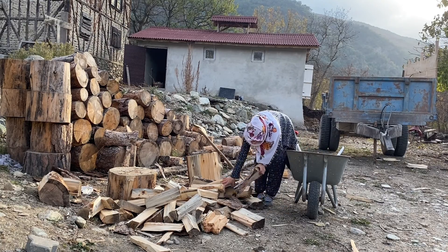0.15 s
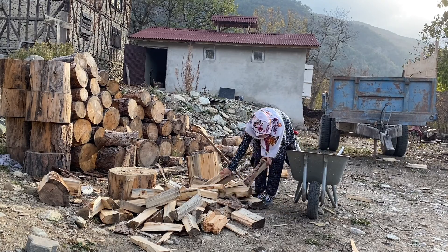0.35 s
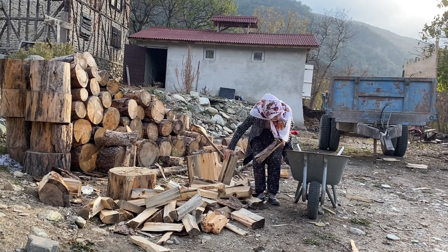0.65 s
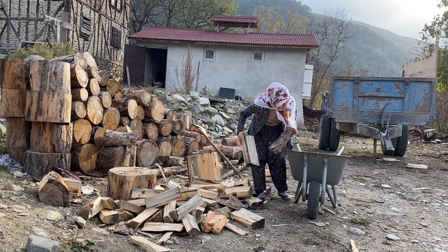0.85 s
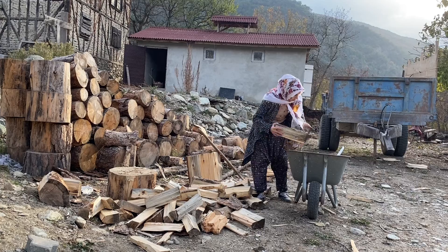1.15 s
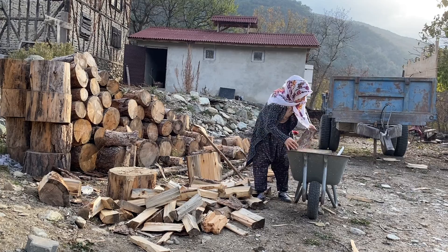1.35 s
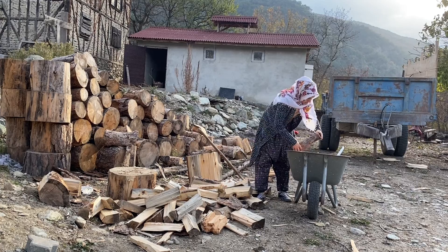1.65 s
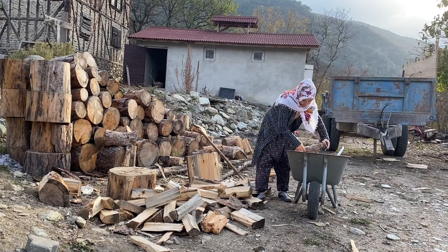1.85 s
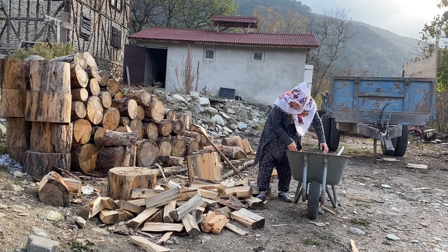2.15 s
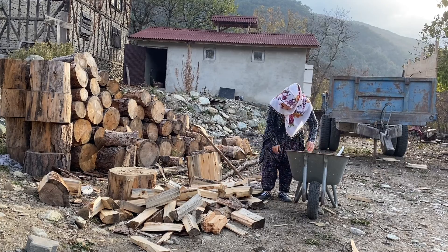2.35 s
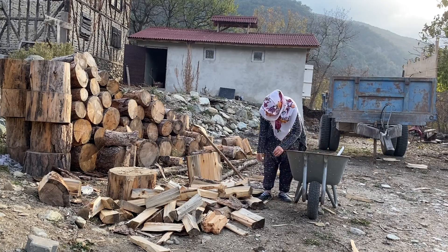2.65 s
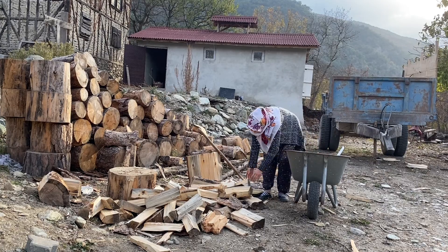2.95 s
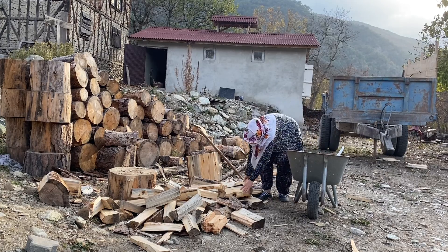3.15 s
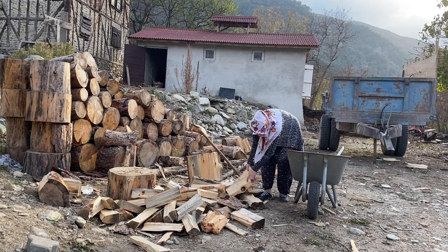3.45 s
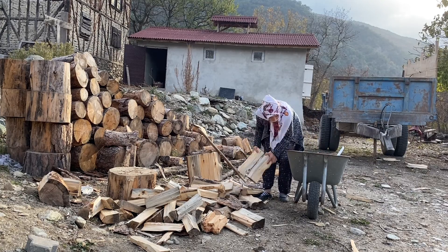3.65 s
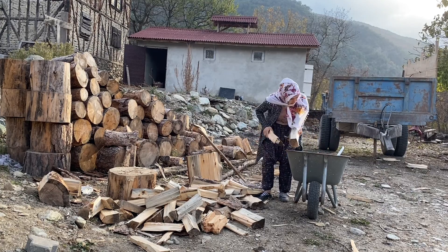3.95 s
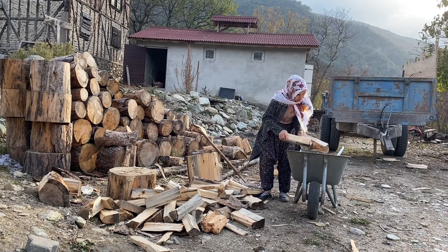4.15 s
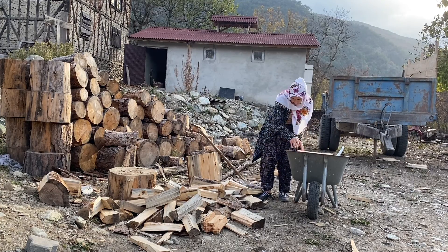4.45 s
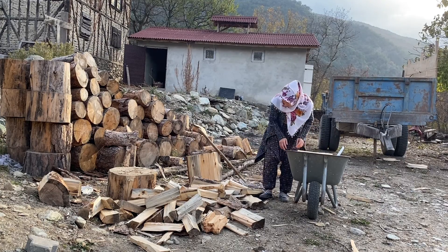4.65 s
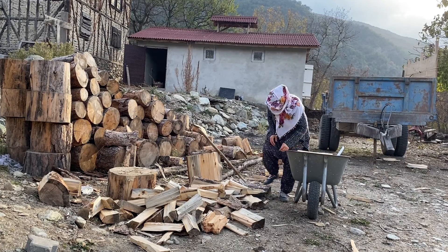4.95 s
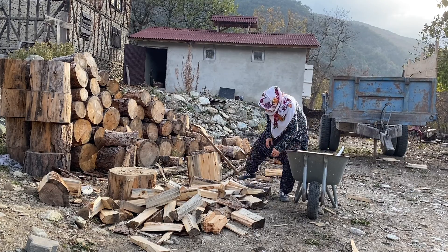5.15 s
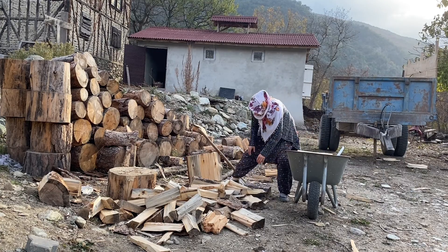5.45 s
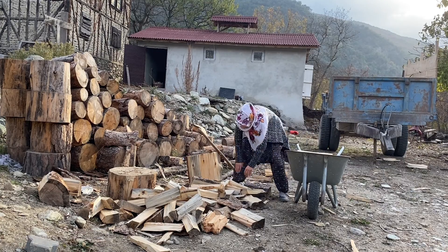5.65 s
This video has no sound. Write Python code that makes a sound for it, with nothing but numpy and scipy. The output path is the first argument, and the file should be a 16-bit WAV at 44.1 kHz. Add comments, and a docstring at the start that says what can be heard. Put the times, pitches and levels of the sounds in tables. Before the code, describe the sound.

Dry logs knock and rustle off a pile and twice tumble into a metal wheelbarrow with a hollow clang, in a quiet yard.

```python
"""Bark scrapes and logs clack over light wind: split firewood is pulled from a heap, a few metres away.
Rough wood slides in tiny slips, splinters snap, knocked logs ring at their bending modes, sleeves brush by.
Logs drop into a steel wheelbarrow and tumble; the tray booms, clangs and rings on.
Wind rumbles at the microphone, a faint hum comes and goes, and the yard walls answer faintly."""
import sys
import numpy as np
from scipy import signal
from scipy.fft import rfft, irfft, next_fast_len
from scipy.io import wavfile
from scipy.ndimage import map_coordinates

SR = 44100
rng = np.random.default_rng(int(sys.argv[2]) if len(sys.argv) > 2 else 0)


def file_out(sig):
    """Save sig as 16-bit WAV at sys.argv[1]."""
    # one column per channel
    cols = np.atleast_2d(sig).T
    # limit, then scale
    lim = np.clip(cols, -1, 1)
    pcm = np.round(lim * 32767).astype(np.int16)
    wavfile.write(sys.argv[1], SR, pcm)


N = 255339
TIME_S = np.arange(N) / SR
AGE_S = np.arange(SR) / SR  # time since a blow

# Events; levels are relative, each layer adds its own gain.
WIND_GUSTS = [(0.0, 0.3, -62), (2.33, 0.11, -53), (2.7, 0.5, -65.5)]  # start_s, length_s, level_db
WOOD_SCRAPES = [(0.0, 0.36, -66, -75.5), (0.38, 0.38, -61, -64.5), (0.61, 0.04, -46, -64),
                (1.43, 0.2, -58, -71.5), (1.98, 0.14, -62, -68.5), (2.22, 0.12, -57.5, -66.5),
                (2.64, 0.25, -63, -83.5), (3.33, 0.33, -55.5, -62), (3.72, 0.3, -63, -79.5),
                (4.35, 0.15, -56, -66.5), (4.55, 0.8, -71, -81.5)]  # start_s, length_s, rub_db, rustle_db
LOG_KNOCKS = [(0.026, -52, -45.5, 455, -65), (0.162, -63, -42.5, 582, -81), (0.531, -31.5, -39, 456, -45),
              (0.608, -23, -33, 1000, -49), (0.617, -10.5, -35, 1110, -42), (0.631, -22, -26, 458, -37),
              (0.65, -22, -24, 1109, -48), (0.744, -41, -46, 564, -60), (0.867, -56, -45.5, 580, -67),
              (1.974, -24, -34, 679, -42), (2.01, -20, -19, 1080, -42), (2.637, -37, -36.5, 794, -74),
              (2.701, -45, -50, 800, -72), (3.406, -35, -43, 1110, -36.5), (3.549, -50, -47, 466, -56),
              (3.75, -39, -35, 455, -37), (3.758, -23.5, -29.5, 450, -37), (3.774, -21, -20.5, 630, -38.5)]  # start_s, clack_db, ring_db, favoured_hz, crack_db
SPLINTER_SNAPS = [(0.0972, -55, -58.5), (0.2775, -44.5, -65.5), (0.4415, -42, -46), (0.4993, -40, -59),
                  (0.5448, -29, -44.5), (0.7317, -44.5, -53), (1.4151, -21.5, -37), (1.4472, -28, -34),
                  (1.8767, -36.5, -43), (2.2355, -41, -57.5), (2.26, -44, -61), (2.302, -46.5, -67),
                  (3.3003, -48.5, -55), (3.324, -46, -53), (3.3421, -39.5, -50), (3.442, -39.5, -46.5),
                  (3.6069, -39, -41), (3.7403, -33.5, -43), (4.0463, -53.5, -61), (4.336, -25, -59),
                  (4.4088, -23.5, -38.5), (5.0923, -64, -65), (5.618, -47, -76)]  # start_s, snap_db, edge_db
SOFT_THUMPS = [(0.26, -40), (0.369, -31.5), (0.533, -37), (2.258, -36), (2.339, -33), (2.666, -38.5)]  # start_s, level_db
SLEEVE_SWISHES = [(0.962, -69, 0.018), (1.185, -74.5, 0.018), (1.312, -63, 0.019), (4.679, -75, 0.074),
                  (4.755, -76, 0.085)]  # centre_s, level_db, half_width_s
TRAY_LANDINGS = [(1.4175, -10, -14.5, -25), (1.4314, -10.5, -14, -25), (1.4569, -9, -21.5, -26.5),
                 (1.4869, -27, -20.5, -38.5), (1.626, -21, -31, -49), (1.6391, -13, -42.5, -59),
                 (1.671, -24.5, -38.5, -57), (1.986, -26, -45, -47.5), (2.0111, -47, -23, -26),
                 (2.037, -24, -28, -34), (2.0732, -19.5, -37, -41), (4.3473, -15.5, -35.5, -39),
                 (4.3586, -19, -29, -38), (4.3866, -11.5, -31.5, -44.5), (4.4287, -17.5, -23.5, -37),
                 (4.4459, -11, -29.5, -46), (4.4743, -22, -31, -54)]  # start_s, boom_db, clang_db, rattle_db
HUM_SWELLS = [(3.68, 0.54, -60)]  # start_s, length_s, level_db

# Modes: pitch_hz, level_db, t60_s
STICK_MODES = [(560, -0.5, .05), (969, 2.5, 0.041), (1790, -4, 0.079), (2490, -4, 0.074),
               (3920, -22, 0.016)]  # thin split piece
LOG_BENDING_MODES = [(459, 6, 0.034), (581, 0.5, 0.085), (807, 13.5, 0.0092), (1098, -1, 0.034)]
LOG_HIGH_MODES = [(290, -21, 0.087), (1177, -17.5, 0.2), (1698, -7.5, 0.08), (2254, -4.5, 0.064),
                  (2370, -5, .05)]  # brought out by hard contact
THUMP_MODES = [(56.6, 3.5, 0.1), (93, -9, 0.075)]
TRAY_PANEL_MODES = [(74.6, -14, 0.038), (107.7, -10.5, 0.55), (135, -8, 0.096), (158, -5, 0.14),
                    (193.7, -1.5, 0.25), (205, 8.5, 0.05), (225.9, -1.5, 0.23), (239, -7, 0.17),
                    (251, -28, 0.37), (293.8, -11, 0.49), (378, -14.5, 0.18), (392.4, -23, 1.25),
                    (443, -32, 0.94)]
TRAY_CLANG_MODES = [(400.5, -0.5, 0.5), (539, -10, 0.64), (590, -14.5, 0.66), (646.6, 9, 0.11),
                    (685, -11.5, 0.99), (710.5, -3, 0.22), (780, -3, 0.37), (861, -3.5, 0.31),
                    (1000, -3.5, 0.31), (1065, -18.5, 0.43), (1440, -14, 0.37), (1843, -11.5, 0.22),
                    (2010, -18, 0.34)]

# Noise spectra: frequency_hz, density_db
HUSH_SPECTRUM = [(76, -19), (130, -6), (230, -10), (400, -11.5), (750, -12.5), (1500, -24), (2600, -27),
                 (3400, -36), (6500, -40), (9000, -52), (16000, -50)]
WIND_SPECTRUM = [(12, -31), (20, -14.5), (47, -1.5), (65, 3.5), (82, -2), (140, -16.5), (161, -23),
                 (220, -25), (290, -50), (480, -120)]
RUB_SPECTRUM = [(200, -1.5), (480, 7), (900, -3.5), (1300, -3.5), (2300, 0), (3200, -11), (5000, -13),
                (9000, -44)]  # wood over wood
CRACK_SPECTRUM = [(1500, -9.5), (3500, 1), (5000, 1), (7200, 2.5), (10000, -8), (13000, -5), (16000, -19.5)]  # treble of wood, bark and cloth
CLACK_SPECTRUM = [(120, -17.5), (330, 6), (700, -3.5), (1100, -6), (1500, -2.5), (2300, -3.5), (3200, -16),
                  (6000, -31.5), (15000, -64.5)]  # wood on wood
SNAP_SPECTRUM = [(250, 12.5), (900, -12), (1700, 2.5), (2400, 6), (3300, -9.5), (5000, -17.5),
                 (9000, -26.5)]  # splinters
BOOM_SPECTRUM = [(25, -57), (45, -20), (70, -5), (130, 14), (220, 9), (330, -8), (500, -20), (1200, -48.5)]  # tray, bass
CLANG_SPECTRUM = [(150, 0.5), (380, 5), (520, -1.5), (690, 1), (1000, 0), (1300, -17.5), (2000, -20.5),
                  (4000, -76)]  # tray, midrange
RATTLE_SPECTRUM = [(600, -21.5), (1400, 4), (2300, 3), (3200, -8), (5000, -19), (7500, -15), (11000, -31),
                   (16000, -29)]  # load in the tray

YARD_DECAY = [(100, 0.3), (600, 0.78), (2500, 0.24), (7000, 0.26), (15000, 0.22)]  # reverberation: frequency_hz, t60_s
MIC_PORTS = [(60, 0, 1.5), (500, 0, 0), (2200, -.1, 0), (3500, -.3, 4), (4500, -.5, 1), (7300, 0, 1),
             (8200, -1.4, 1), (9000, -3.1, .5), (10600, -6.1, 0), (11900, -6.8, 0), (13200, -9.4, 0),
             (14800, -12.4, .5)]  # frequency_hz, left_lead_rad, left_minus_right_db

SCRAPE_ATTACK_S, SCRAPE_RELEASE_S = 0.025, 0.05


def amp(db):
    """Decibels to gain."""
    return np.exp(np.asarray(db) * (np.log(10) / 20))


def unit(x):
    """Scale to rms 1."""
    return x / np.sqrt(np.mean(x ** 2) + 1e-20)


def along(points, hz):
    """Interpolate (frequency_hz, value) points on a log axis."""
    point_hz, values = np.transpose(points)
    return np.interp(np.log(hz + 1), np.log(point_hz + 1), values)


def wobble(rate_hz):
    """Smooth random curve through rate_hz knots a second."""
    grid = np.arange(0, N / SR * rate_hz + 1, 1 / 8)
    knots = rng.standard_normal(int(grid[-1]) + 3)
    return np.interp(TIME_S * rate_hz, grid, map_coordinates(knots, [grid]))


def noise(spectrum, width, size=N):
    """Coloured stereo noise, rms 1; width is side over mid."""
    n_fft = next_fast_len(size)
    colour = amp(along(spectrum, np.fft.rfftfreq(n_fft, 1 / SR)))
    mid, side = irfft(rfft(rng.standard_normal((2, n_fft))) * colour, n_fft)[:, :size]
    return unit(np.array([mid + width * side, mid - width * side]))


def strokes(rows, attack_s, release_s):
    """Attack, hold, release for (start_s, length_s, level_db, ..) rows; one curve per level column."""
    start_s, length_s, *levels_db = np.transpose(rows)
    age_s = TIME_S - start_s[:, None]
    rise = np.clip(age_s / attack_s, 0, 1)
    fall = np.exp(-np.maximum(age_s - length_s[:, None], 0) / release_s)
    return amp(levels_db) @ (rise * fall)


def burst(spectrum, t60_s, attack_s, width):
    """Decaying noise: many close modes struck together."""
    t = AGE_S[:int(1.5 * t60_s * SR)]
    return noise(spectrum, width, size=len(t)) * amp(-60 * t / t60_s) * (1 - np.exp(-t / attack_s))


def mode_waves(modes, attack_s, pitch_ratio=1):
    """One decaying sine per mode."""
    hz, db, t60_s = np.transpose(modes)[:, :, None]
    t = AGE_S[:int(t60_s.max() * SR)]
    envelope = amp(db - 60 * t / t60_s) * (1 - np.exp(-t / attack_s))
    return envelope * np.sin(2 * np.pi * hz * pitch_ratio * t)


def strike(waves, scatter_db):
    """Random mix of modes: each contact point favours different ones."""
    return amp(scatter_db * rng.standard_normal(len(waves))) @ waves


def ring(modes, attack_s, scatter_db, detune):
    """One blow on a piece of slightly random size."""
    pitch_ratio = np.exp(detune * rng.standard_normal())
    return strike(mode_waves(modes, attack_s, pitch_ratio), scatter_db)


def add(track, start_s, sound):
    """Mix a sound in at start_s."""
    start = max(round(start_s * SR), 0)
    part = sound[..., :N - start]
    track[:, start:start + part.shape[-1]] += part


def air():
    """Steady outdoor hush; breeze and gusts rumble at the microphone."""
    hush = amp(-61) * noise(HUSH_SPECTRUM, width=0.93)
    breeze = amp(-58)
    gusts, = strokes(WIND_GUSTS, attack_s=0.036, release_s=0.1)
    buffeting = amp(4.5 + 2.3 * wobble(11))
    return hush + (breeze + gusts) * buffeting * noise(WIND_SPECTRUM, width=0.32)


def scraping(jostles=110):
    """Rough wood slides in tiny uneven slips; harder rubbing jostles nearby pieces more often."""
    pressure, bark = strokes(WOOD_SCRAPES, SCRAPE_ATTACK_S, SCRAPE_RELEASE_S)
    slips = unit(amp(3.3 * wobble(260) + 1.9 * wobble(34)))
    rub = amp(-2.5) * pressure * noise(RUB_SPECTRUM, width=0.47)
    rustle = amp(-3.5) * bark * noise(CRACK_SPECTRUM, width=0.23)
    out = slips * (rub + rustle)
    for at in np.searchsorted(np.cumsum(pressure), rng.random(jostles) * pressure.sum()):
        stick = ring(STICK_MODES, attack_s=0.0006, scatter_db=2.5, detune=0.13)
        add(out, at / SR, amp(-0.5) * pressure[at] * stick)
    return out


def crumbling(snaps=34):
    """Dragged bark sheds small snaps, more and louder where it rustles most."""
    _, bark = strokes(WOOD_SCRAPES, SCRAPE_ATTACK_S, SCRAPE_RELEASE_S)
    out = np.zeros((2, N))
    quantiles = (np.arange(snaps) + rng.random(snaps)) / snaps
    for at in np.searchsorted(np.cumsum(bark), quantiles * bark.sum()):
        clack = burst(CLACK_SPECTRUM, t60_s=0.022, attack_s=0.0007, width=0.3)
        crack = burst(CRACK_SPECTRUM, t60_s=0.014, attack_s=0.00072, width=0.43)
        add(out, at / SR, amp(14) * bark[at] * clack)
        add(out, at / SR, amp(11) * bark[at] * crack)
    return out


def logs(focus_db_per_octave=32):
    """Two logs meet with a crack and a dry clack; bending modes near the favoured pitch ring most."""
    out = np.zeros((2, N))
    bending = mode_waves(LOG_BENDING_MODES, attack_s=0.00073)
    mode_hz = np.transpose(LOG_BENDING_MODES)[0]
    for start_s, clack_db, ring_db, favoured_hz, crack_db in LOG_KNOCKS:
        mode_db = ring_db - focus_db_per_octave * np.abs(np.log2(mode_hz / favoured_hz))
        mode_db[-1] = max(mode_db[-1], min(clack_db - 3, ring_db))  # a hard clack excites the top mode
        clack = burst(CLACK_SPECTRUM, t60_s=0.026, attack_s=0.00047, width=0.36)
        overtones = ring(LOG_HIGH_MODES, attack_s=0.0003, scatter_db=5.0, detune=0.015)
        crack = burst(CRACK_SPECTRUM, t60_s=0.064, attack_s=0.0002, width=0.1)
        add(out, start_s, amp(clack_db - 5.5) * clack)
        add(out, start_s, amp(clack_db - 15.5) * overtones)
        add(out, start_s, amp(mode_db) @ bending)
        add(out, start_s, amp(crack_db - 3.5) * crack)
    return out


def splinters():
    """Bark and splinters catch and let go: bright-edged snaps, each on a piece of its own size. A few of them,
    near 1.415, 4.336 and 4.409 s, are logs first striking the wheelbarrow's edge."""
    out = np.zeros((2, N))
    for start_s, snap_db, edge_db in SPLINTER_SNAPS:
        snap = burst(SNAP_SPECTRUM, t60_s=0.074, attack_s=0.00051, width=0.24)
        stick = ring(STICK_MODES, attack_s=0.0007, scatter_db=2.5, detune=0.08)
        edge = burst(CRACK_SPECTRUM, t60_s=0.014, attack_s=0.0011, width=0.3)
        add(out, start_s, amp(snap_db - 7) * snap)
        add(out, start_s, amp(snap_db - 14.5) * stick)
        add(out, start_s, amp(edge_db + 7.5) * edge)
    return out


def thumps():
    """Soft low thumps of handling and air."""
    out = np.zeros((2, N))
    thump = mode_waves(THUMP_MODES, attack_s=0.0053).sum(axis=0)
    for start_s, level_db in SOFT_THUMPS:
        add(out, start_s, amp(level_db + 6) * thump)
    return out


def sleeves():
    """Cloth slides over wood in soft, uneven swells."""
    swell = sum(amp(level_db) * np.exp(-((TIME_S - centre_s) / half_width_s) ** 2)
                for centre_s, level_db, half_width_s in SLEEVE_SWISHES)
    return swell * amp(2.5 * wobble(100)) * noise(CRACK_SPECTRUM, width=0.49)


def wheelbarrow(tilt_per_octave=0.68, usual_rattle_db=-11.5):
    """Each landing swings the tray's panels, sets its higher modes clanging and rattles the load."""
    out = np.zeros((2, N))
    panels = mode_waves(TRAY_PANEL_MODES, attack_s=0.0027)
    steel = mode_waves(TRAY_CLANG_MODES, attack_s=0.00056)
    octaves = np.log2(np.transpose(TRAY_CLANG_MODES)[0])
    for start_s, boom_db, clang_db, rattle_db in TRAY_LANDINGS:
        hardness_db = rattle_db - clang_db - usual_rattle_db  # harder blow: more rattle, brighter steel
        tilt = amp(tilt_per_octave * hardness_db * (octaves - octaves.mean()))
        panel_ring = strike(panels, scatter_db=2.4)
        boom = burst(BOOM_SPECTRUM, t60_s=0.11, attack_s=0.001, width=0.19)
        steel_ring = strike(tilt[:, None] * steel, scatter_db=2.04)
        clang = burst(CLANG_SPECTRUM, t60_s=0.24, attack_s=0.0019, width=0.37)
        rattle = burst(RATTLE_SPECTRUM, t60_s=0.16, attack_s=0.0019, width=0.43)
        add(out, start_s, amp(boom_db - 9.5) * panel_ring)
        add(out, start_s, amp(boom_db - 11.5) * boom)
        add(out, start_s, amp(clang_db - 15.5) * steel_ring)
        add(out, start_s, amp(clang_db - 5.0) * clang)
        add(out, start_s, amp(rattle_db - 5.5) * rattle)
    return out


def hum(pitch_hz=434, fade_s=0.085):
    """A faint tone swells, wavers in level and fades."""
    level, = strokes(HUM_SWELLS, fade_s, fade_s)
    return level * amp(0.66 * wobble(14)) * np.sin(2 * np.pi * pitch_hz * TIME_S)


def with_reflections(x, level_db, count=8):
    """Direct sound plus weak early copies off stony ground and stacked wood."""
    out = x.copy()
    for delay_s in rng.uniform(0.001, 0.014, count):
        add(out, delay_s, rng.choice([-1, 1]) * amp(level_db) * x)
    return out


def yard(x, build_s=0.0089):
    """Diffuse answer of walls, woodpile and trees, dying sooner in the treble."""
    hz, t, bins = signal.stft(rng.standard_normal((2, SR)), SR, nperseg=256)
    decay = amp(-60 * t / along(YARD_DECAY, hz)[:, None])
    _, tail = signal.istft(bins * decay * (1 - np.exp(-t / build_s)), SR, nperseg=256)
    return signal.fftconvolve(x, tail / np.linalg.norm(tail[0]), axes=1)[:, :N]


def scene():
    """Wood and wheelbarrow in the open yard."""
    wood = with_reflections(logs() + splinters() + scraping() + crumbling(), level_db=-18.5)
    tray = wheelbarrow()
    reverb = yard(amp(-18.5) * wood + amp(-18) * tray)
    return wood + tray + reverb + sleeves() + air() + thumps() + hum()


def record(dry):
    """Two microphone ports differ in phase and level, mainly in the treble; deep bass and top are cut."""
    low_cut_hz, top_hz = 34, 16400
    n_fft = next_fast_len(N + SR // 2)
    hz = np.fft.rfftfreq(n_fft, 1 / SR)
    port_hz, lead_rad, balance_db = np.transpose(MIC_PORTS)
    split = np.array([[0.5], [-0.5]])  # half to each side
    balance = amp(split * np.interp(hz, port_hz, balance_db))
    phase = np.exp(1j * split * np.interp(hz, port_hz, lead_rad))
    low_cut = (1j * hz / (1j * hz + low_cut_hz)) ** 2
    return irfft(rfft(dry, n_fft) * balance * phase * low_cut * (hz < top_hz), n_fft)[:, :N]


dry = scene()
out = record(dry)
file_out(out)
```